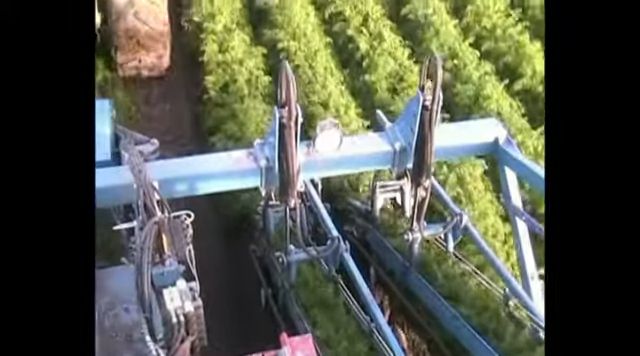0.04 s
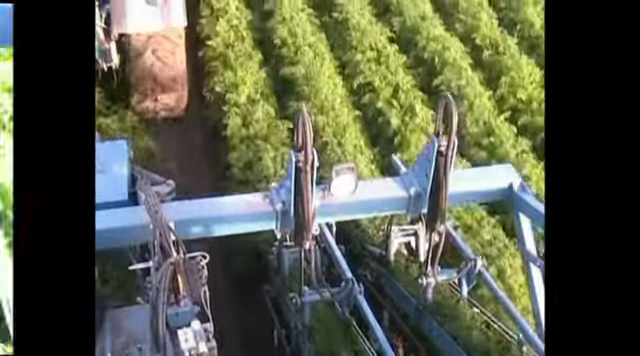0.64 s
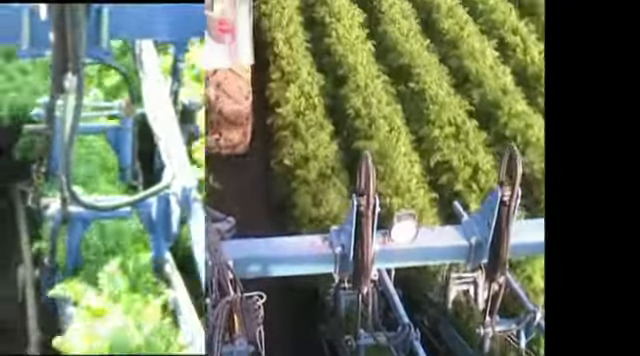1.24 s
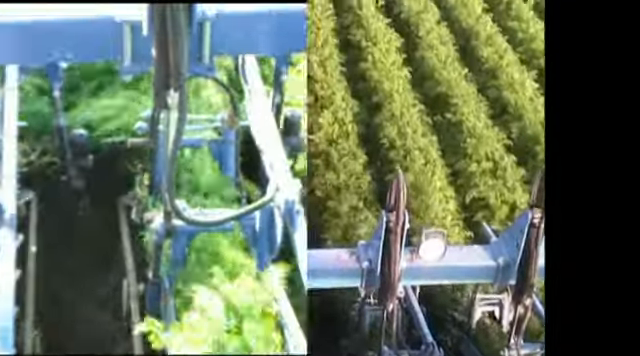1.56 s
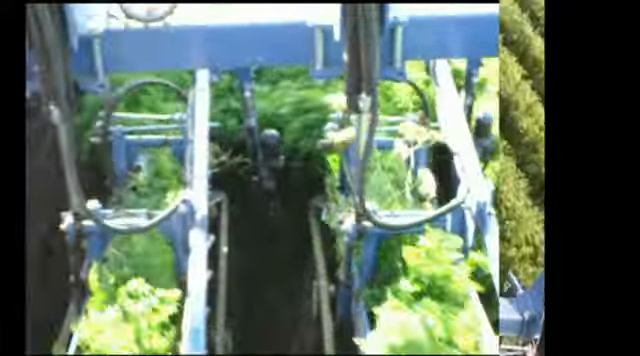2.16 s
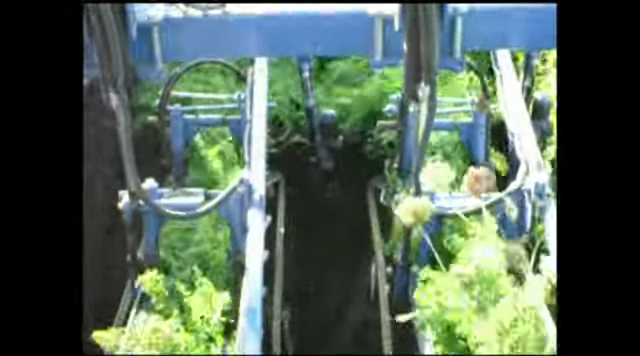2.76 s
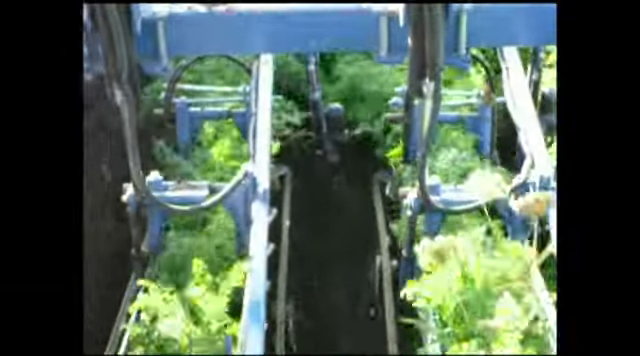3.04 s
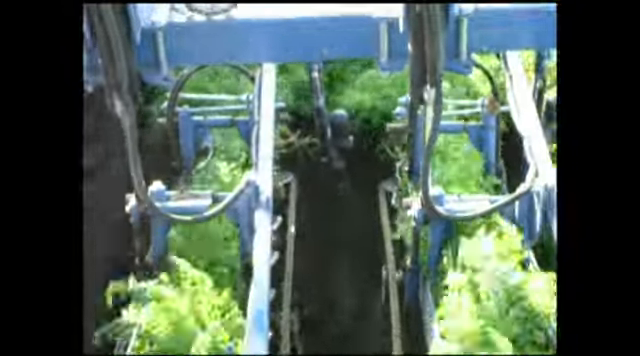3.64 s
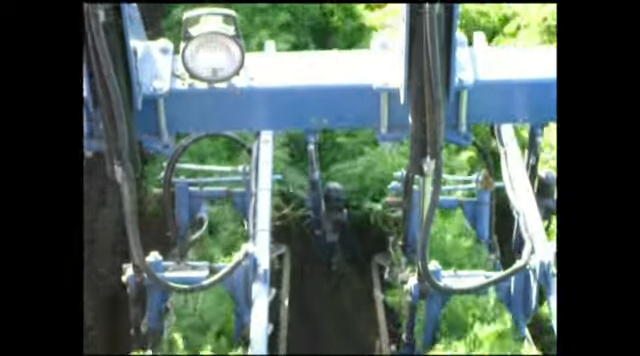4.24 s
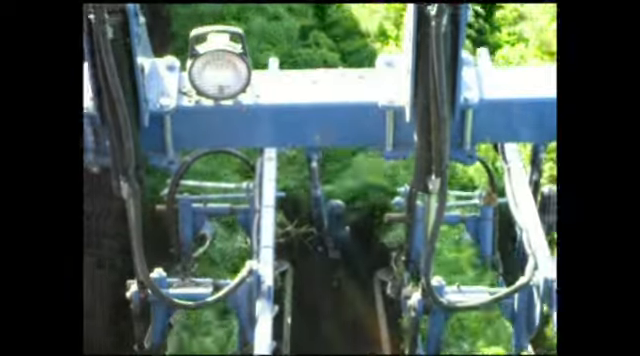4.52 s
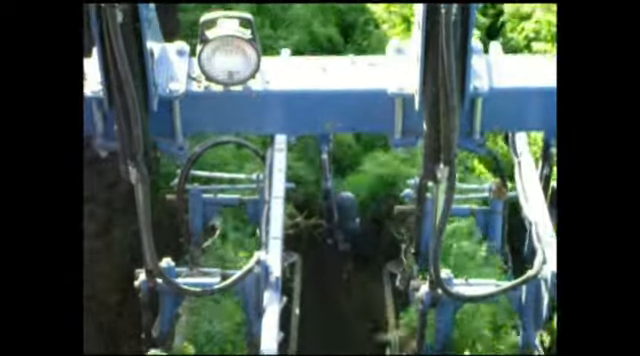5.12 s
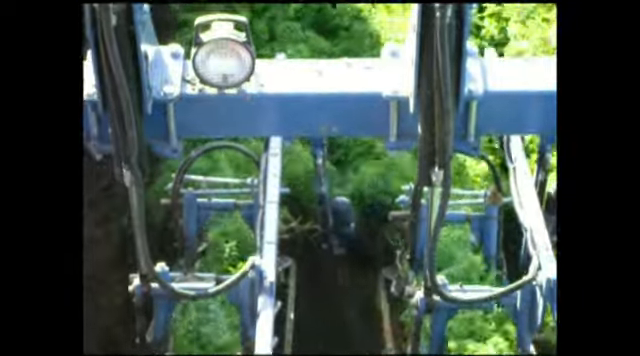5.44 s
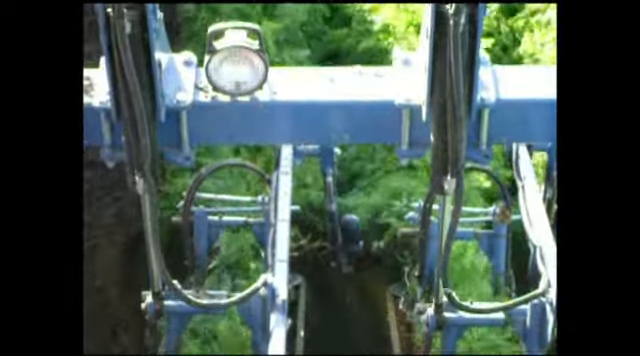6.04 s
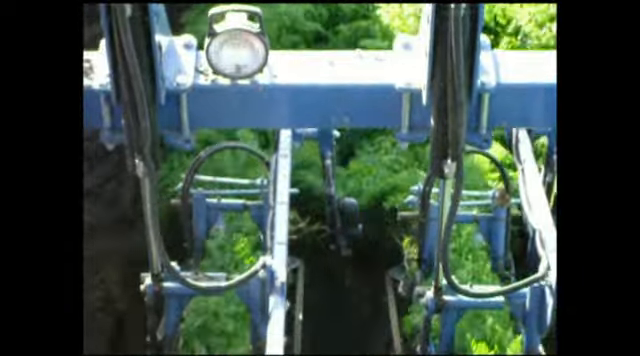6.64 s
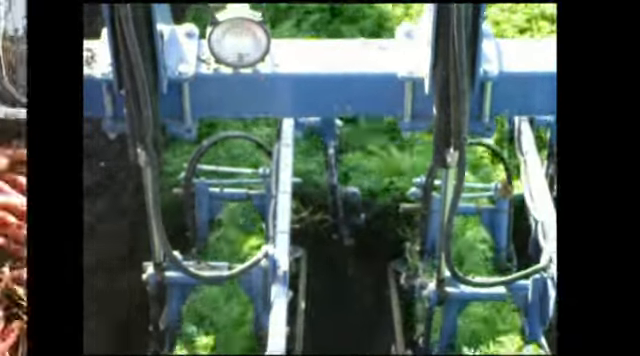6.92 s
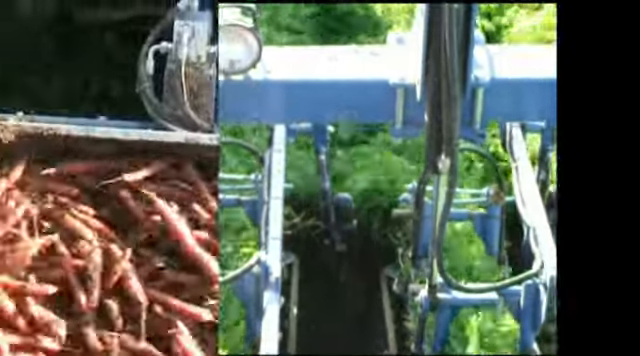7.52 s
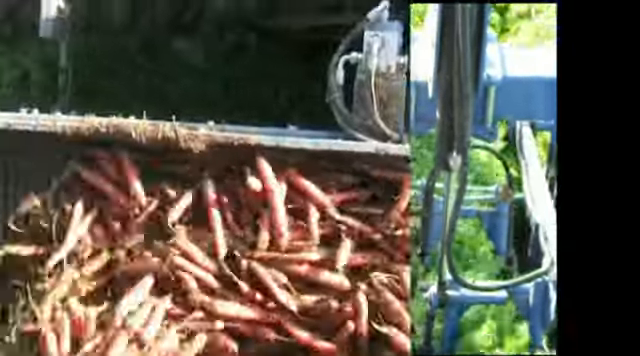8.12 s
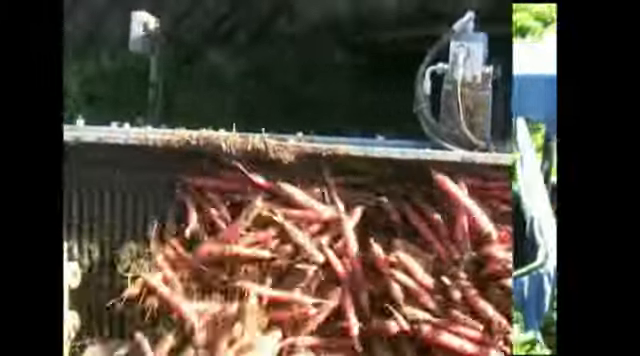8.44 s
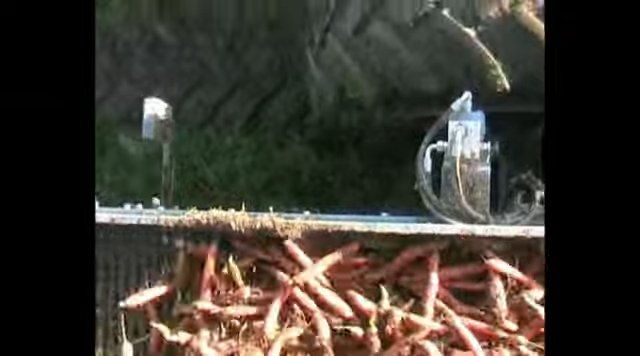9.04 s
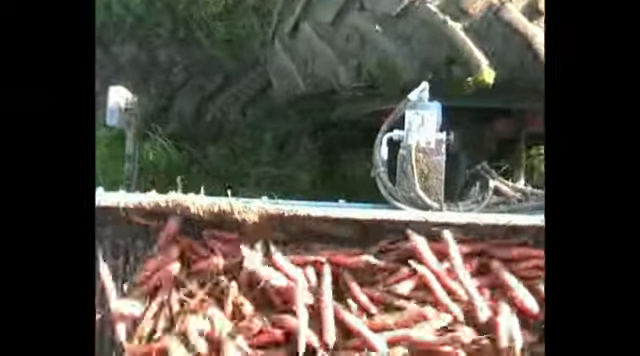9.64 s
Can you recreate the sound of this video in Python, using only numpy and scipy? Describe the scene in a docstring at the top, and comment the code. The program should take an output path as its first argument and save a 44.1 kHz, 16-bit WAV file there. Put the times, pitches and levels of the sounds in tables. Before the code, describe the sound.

Heard close up from three places that blend into one another, a harvester works through a carrot field. First comes a loud diesel drone with gear whine, rustling tops, a short squeal and a few knocks. Next the lifting belts give a softer, dull rush and hum. Finally the conveyor rattles loudly with tumbling carrots, sifting soil and irregular knocks of stones on steel.

```python
"""A carrot harvester at work

The tractor-drawn machine is heard from three places, each fading into the next: above the boom (loud),
over the lifting belts (quieter, dull) and beside the carrot conveyor (loud, rattling).
A diesel fires steadily against the hum of a slower hydraulic drive. Gears whine, a pulley squeals,
leaves swish along the guides, stones knock on steel and earth sifts through the conveyor's rods."""
import sys
import numpy as np
from scipy import signal
from scipy.fft import rfft, irfft, next_fast_len
from scipy.io import wavfile
from scipy.ndimage import uniform_filter1d, map_coordinates

SR = 44100
rng = np.random.default_rng(int(sys.argv[2]) if len(sys.argv) > 2 else 0)


def unload_wav(signal):
    """Save mono or channel-first audio to the path in sys.argv[1] as 16-bit WAV at rate SR, clipped to [-1, 1]."""
    wavfile.write(
        sys.argv[1],
        SR,
        np.round(np.clip(np.atleast_2d(signal).T, -1, 1) * 32767).astype(np.int16),
    )


N = 430857

# how alike left and right sound at each place: pitch_hz, likeness (0 to 1)
BOOM_LIKENESS = [(60, .3), (140, .92), (340, .93), (820, .94), (2000, .88), (4700, .7), (11000, .55)]
CONVEYOR_LIKENESS = [(60, .1), (140, .78), (340, .96), (820, .94), (2000, .88), (4700, .72), (11000, .55)]
# how sound reaches the two sides at each place: pitch_hz, left_louder_db, left_ahead_radians
BOOM_SIDES = [(30, 3, -2.4), (70, 4.5, -1.1), (170, 2.2, -.5), (280, 1.3, -.35), (400, 1.8, -.5),
              (520, -.7, -.4), (800, .4, -.25), (1700, .6, -.2), (3800, -.2, -.65), (5200, 0, -.55),
              (8700, .3, -1.45), (11300, .5, -2.8)]
CONVEYOR_SIDES = [(60, -8, 2.0), (150, -4.8, 1.15), (280, -2.8, .45), (420, -4, .12), (530, -3, .2),
                  (650, -3.8, 0), (830, -5, 0), (1500, -3.2, -.15), (4000, -1.5, -.95), (7300, 0, -1.5),
                  (11300, .3, -3)]
UNLOAD_S, UNLOAD_LENGTH_S = 6.0, 0.128  # the belts lose their load


def amp(db):
    """Turns decibels into a number to multiply by."""
    return 10 ** (np.asarray(db) / 20)


def unit(x):
    """Scales a sound to an average power of 1."""
    return x / np.sqrt(np.mean(x ** 2) + 1e-20)


def along(points, hz):
    """Reads between (pitch_hz, value) rows on a logarithmic pitch scale."""
    pitches, values = np.transpose(points)
    return np.interp(np.log(hz + 1), np.log(pitches + 1), values)


def curve(rows):
    """One value per sample from (time_s, value) rows."""
    return np.interp(np.arange(N) / SR, *np.transpose(rows))


def since(start_s):
    """Seconds gone by after start_s."""
    return np.maximum(np.arange(N) / SR - start_s, 0)


def ramp(start_s, length_s):
    """Rises in a straight line from 0 to 1."""
    return np.minimum(since(start_s) / length_s, 1)


def wobble(per_second):
    """A smooth curve through per_second random values each second."""
    positions = np.arange(0, N + 64, 64) * per_second / SR
    coarse = map_coordinates(rng.standard_normal(1024), [positions], mode="wrap")
    return np.interp(np.arange(N) / 64, np.arange(len(coarse)), coarse)


def angle(hz):
    """How far a shaft has turned, in radians, at hz turns a second."""
    return 2 * np.pi * np.cumsum(hz) / SR


def filtered(x, response):
    """Multiplies each frequency in x by response(hz)."""
    size = next_fast_len(N + 8192)
    return irfft(rfft(x, size) * response(np.fft.rfftfreq(size, 1 / SR)), size)[..., :N]


def band(x, centre_hz, half_width_hz):
    """The part of x near one pitch."""
    return filtered(x, lambda hz: 1 / (1 + ((hz - centre_hz) / half_width_hz) ** 2))


def ringing(pitch_hz, half_width_hz, level_db):
    """A part shaken at random rings in a narrow band of noise."""
    return amp(level_db) * unit(band(rng.standard_normal(N), pitch_hz, half_width_hz))


def churn(patchy_db):
    """Two noises with louder and softer patches across time and pitch."""
    spectra = signal.stft(rng.standard_normal((2, N)), nperseg=512)[2]
    patches = rng.standard_normal(spectra.shape[1:])
    patches = uniform_filter1d(uniform_filter1d(patches, 6, axis=0), 12, axis=1)
    return unit(signal.istft(spectra * amp(patchy_db * unit(patches)), nperseg=512)[1][:, :N])


def rattle(per_second, decay_s):
    """Many small hits, each a short burst of noise."""
    hits = (rng.random(N) < per_second / SR) * rng.uniform(.3, 1, N) ** 4
    energy = signal.lfilter([1], [1, -np.exp(-1 / (decay_s * SR))], hits)
    return unit(np.sqrt(energy) * rng.standard_normal((2, N)))


def spread(pair, spectrum, likeness):
    """Shapes the tone of two noises and blends them into left and right."""
    def response(hz):
        turn = np.arccos(np.clip(along(likeness, hz), 0, 1)) / 2
        return amp(along(spectrum, hz)) * np.array([np.cos(turn), np.sin(turn)])
    middle, side = filtered(pair, response)
    return np.array([middle + side, middle - side]) / np.std(middle)


def to_sides(x, sides):
    """Sound reaches left and right at different levels and slightly out of step."""
    half, table = np.array([[.5], [-.5]]), np.array(sides)
    louder, ahead = table[:, :2], table[:, ::2]
    return filtered(x, lambda hz: amp(half * along(louder, hz)) * np.exp(1j * half * along(ahead, hz)))


def harmonics(shaft, rows, flutter_db, jitter_radians):
    """The tones of one turning part at the three places; higher ones waver most."""
    out = np.zeros((3, N))
    for multiple, *place_db in rows:
        shake = np.sqrt(multiple)
        flutter = amp(flutter_db * shake * wobble(14))
        tone = np.sin(multiple * shaft + jitter_radians * shake * wobble(12))
        out += np.sqrt(2) * amp(place_db)[:, None] * flutter * tone
    return out


def diesel_speed():
    """Firings a second: the engine wanders a little and slows slightly as the load comes on."""
    firing_hz, droop_hz, wander_hz = 80.9, 0.3, 0.05
    return firing_hz - droop_hz * ramp(start_s=1.766, length_s=1.5) + wander_hz * wobble(1)


def diesel(firing):
    """The engine's even firings blend into a drone."""
    # engine tones: multiple of the firing rate, boom_db, belts_db, conveyor_db
    engine_tones = [(1, -24.5, -39, -31), (2, -29, -45, -32), (3, -20.5, -59, -38), (5, -32, -60, -37.5),
                    (6, -32, -56, -43.5), (7, -37.5, -61.5, -54)]
    return harmonics(firing, engine_tones, flutter_db=.5, jitter_radians=0.023)


def drive_speed():
    """Turns a second: the drive speeds up as the belts run light, then sags as the conveyor fills."""
    lifting_hz, light_hz, laden_hz = 72.43, 75.24, 69.16
    fill_s, fill_lag_s = 7.78, 0.48
    unloaded = ramp(UNLOAD_S, UNLOAD_LENGTH_S)
    fullness = 1 - np.exp(-since(fill_s) / fill_lag_s)
    return lifting_hz + (light_hz - lifting_hz) * unloaded + (laden_hz - light_hz) * fullness


def hydraulic_drive(drive):
    """The turning drive hums; at the belts the hum drops when they lose their load."""
    # drive tones: multiple of the turning rate, boom_db, belts_db, conveyor_db
    drive_tones = [(1, -69, -45.5, -37.5), (2, -72, -36.5, -22.5), (2.5, -70, -53.5, -56),
                   (3, -70, -48.5, -33.5), (3.5, -70, -56.5, -60), (4, -33.5, -50, -26.5),
                   (5, -70, -59, -39), (6, -70, -64.5, -39.5), (7.5, -72, -62, -33), (9.5, -70, -59.5, -42)]
    hum = harmonics(drive, drive_tones, flutter_db=0.34, jitter_radians=0.1)
    hum[1] *= amp(-21 * ramp(UNLOAD_S, UNLOAD_LENGTH_S))
    return hum


def gears(drift, roughness, swing_db):
    """Gear and pump tones rise and sag together with the load."""
    # gear and pump tones: pitch_hz, boom_db, belts_db, conveyor_db
    whines = [(103.2, -33, -59, -58), (252.8, -34, -51.5, -57), (294.3, -33.5, -54, -37.5),
              (496.3, -34.5, -51, -51), (512.4, -39, -45.5, -32), (527.5, -49, -58.5, -30.5),
              (564, -41, -55, -52), (671, -42, -59, -35.5), (833.5, -32, -51.5, -34.5),
              (1529, -36, -58.5, -53)]
    # how fast the gears turn: time_s, share of the usual speed
    gear_speed = [(0, 1), (.8, .997), (2.2, 1.003), (4, 1), (6, 1.004), (7, 1.002), (7.5, .997),
                  (8.7, .997), (9, 1.01), (9.2, 1.002), (9.77, .998)]
    speed = curve(gear_speed) + drift * wobble(6)
    out = np.zeros((3, N))
    for hz, *place_db in whines:
        tone = np.sin(angle(hz * speed) + roughness * np.sqrt(hz / 800) * wobble(30))
        out += amp(place_db)[:, None] * unit(tone * amp(swing_db * wobble(9.2)))
    return out


def boom(tones, firing):
    """Above the boom: roar and ringing steel pulse with the firings, over a drone and a squeal."""
    # tone of the roar: pitch_hz, relative_db
    roar_shape = [(25, -42), (52, -17), (75, -19), (140, -7), (175, -7), (205, 2.5), (245, -4), (300, -4),
                  (360, -8), (500, -6), (800, -12.5), (1100, -15), (2000, -18.5), (3200, -25.5),
                  (6300, -36.5), (8500, -36), (10800, -47), (12000, -76)]
    # how hard the boom shakes on uneven ground: time_s, level_db
    shaking = [(0, -16.5), (.15, -15.5), (.3, -18), (.45, -15.5), (.7, -16), (1.15, -16.5), (1.5, -15.5),
               (1.8, -15.5), (2.1, -15), (2.4, -19)]
    # steel parts kept ringing by the shaking: pitch_hz, half_width_hz, level_db
    steel_parts = [(768, 20, -31.5), (1300, 20, -41), (2160, 18, -47), (2530, 17, -41.5)]
    pulsing = amp(0.51 * np.cos(firing) + 0.31 * wobble(14.2))
    roar = amp(curve(shaking)) * spread(churn(patchy_db=0.94), roar_shape, BOOM_LIKENESS)
    steel = sum(ringing(*part) for part in steel_parts)
    drone = tones * amp(0.5 - 1.3 * since(0))  # eases by 1.3 dB a second
    return to_sides(drone + (roar + steel) * pulsing + pulley_squeal(), BOOM_SIDES)


def leaves():
    """Carrot tops swish along the guides in tufts; stalks scrape brightly over steel."""
    # how strongly the tops brush the guides: time_s, level_db
    leaf_flow = [(0, -36), (.1, -38), (.3, -39.5), (.42, -34.5), (.63, -41), (.75, -37.5), (1.0, -39),
                 (1.2, -39), (1.6, -35.5), (2.0, -37.5), (2.4, -35)]
    # dragged stalks: start_s, length_s, level_db
    scrapes = [(0.355, 0.17, -28.5), (0.692, 0.094, -31.5)]
    # tone of the swish and of the scrapes: pitch_hz, relative_db
    swish_shape = [(600, -21), (2200, -4.5), (4000, -2.5), (6500, -4), (8600, -0.5), (10300, -5.5),
                   (11200, -16), (12000, -54), (14000, -80)]
    scrape_shape = [(700, -17), (1400, 10), (2400, 8), (4000, -2), (8500, -7), (11000, -5.5),
                    (14000, -19.5)]
    swish = spread(churn(patchy_db=2.0), swish_shape, BOOM_LIKENESS)
    tufts_db = -2 * wobble(13.6)
    swish *= amp(curve(leaf_flow) + tufts_db)
    strokes = sum(amp(db) * np.sin(np.pi * ramp(start_s, length_s)) for start_s, length_s, db in scrapes)
    scrape = strokes * spread(rattle(per_second=720, decay_s=0.0028), scrape_shape, BOOM_LIKENESS)
    return to_sides(swish + scrape, BOOM_SIDES)


def wide_hiss():
    """A thin, high hiss, opposite in left and right, seems to come from all round."""
    # tone of the hiss: pitch_hz, relative_db
    hiss_shape = [(8500, -25), (10300, -6), (11200, 1), (12500, 1), (14500, -6.5), (15200, -9)]
    hiss = unit(filtered(rng.standard_normal(N), lambda hz: amp(along(hiss_shape, hz))))
    return np.array([hiss, -hiss])


def belts(tones, drive):
    """Over the lifting belts: a muffled, centred rush with fine ticking and thinly singing rollers."""
    # tone of the rush, and the muffling of its treble: pitch_hz, relative_db
    rush_shape = [(20, -12), (45, -4), (80, -2), (130, 0.5), (280, 0), (400, -4), (510, -1), (620, -2.5),
                  (1100, -6.5), (1450, -10.5), (2000, -9), (2400, -7.5), (3200, -11), (5100, -19),
                  (6500, -24.5)]
    muffling = [(5100, 0), (5550, -14), (5900, -2.5), (6500, -7), (7000, -13), (7600, -27), (8200, -65)]
    # how thickly the crop crowds the belts: time_s, level_db
    crop_load = [(0.4, -38), (1.1, -30), (1.55, -28.5), (1.95, -34.5), (2.4, -34.5), (6.0, -34.5),
                 (6.13, -35.5)]
    rush = churn(patchy_db=0.6)[0] * amp(.5 * np.cos(2 * drive))
    ticking = 0.39 * rattle(per_second=90, decay_s=0.0048)[0]
    muffled = filtered(rush + ticking, lambda hz: amp(along(rush_shape, hz) + along(muffling, hz)))
    rollers = ringing(pitch_hz=2286, half_width_hz=26, level_db=-52.5)
    return tones + rollers + amp(curve(crop_load)) * unit(muffled)


def pulley_squeal():
    """A belt pulley squeals hoarsely, swelling fast and dying away slowly."""
    start_s, rise_s, fall_db_per_s = .38, 0.22, 8.5
    squeal = ringing(pitch_hz=4730, half_width_hz=150, level_db=-38)
    return squeal * ramp(start_s, rise_s) * amp(.8 * wobble(29.9) - fall_db_per_s * since(start_s))


def stones():
    """Stones and carrots knock on the steel frame, whose ring is cut short by soil."""
    # knocks: start_s, relative_db, treble_limit_hz
    knocks = [(0.697, -29, 9000), (0.739, -28, 9050), (1.453, -34, 10000), (1.5585, -31, 10000),
              (1.793, -35, 9900), (7.21, -27.5, 4840), (7.3102, -25.5, 6670), (7.522, -29, 6470),
              (7.6804, -29, 9060), (7.804, -30, 10000), (8.049, -26.5, 9800), (8.5396, -26, 9300),
              (8.6073, -28, 10040), (8.974, -24, 7940), (9.1165, -21, 7000), (9.1603, -21.5, 5230),
              (9.2, -21, 4530), (9.351, -20.5, 6600), (9.5294, -29.5, 10000), (9.721, -21.5, 6000)]
    # notes of the struck frame: pitch_hz, relative_db, ring_s (time to fade by 60 dB)
    steel_notes = [(1280, -10, .03), (2320, -2, .03), (3360, 6, 0.028), (4150, 9.5, 0.026),
                   (5200, -12, .025), (6300, -1, .02)]
    out, t = np.zeros(N + SR), np.arange(SR // 6) / SR
    for start_s, knock_db, treble_limit_hz in knocks:
        ring = np.zeros(len(t))
        for hz, note_db, ring_s in steel_notes:
            fade = amp(note_db + rng.normal(0, 2.7) - 60 * t / ring_s)
            ring += fade * np.sin(2 * np.pi * hz * rng.normal(1, 0.035) * t)
        crack = 2.9 * amp(-60 * t / 0.075) * rng.standard_normal(len(t))
        treble_cut = signal.butter(4, treble_limit_hz, fs=SR, output="sos")
        knock = signal.sosfilt(treble_cut, 0.59 * ring + crack)
        out[round(start_s * SR):][:len(t)] += amp(knock_db - 10.5) * knock
    return filtered(out[:N], lambda hz: hz < 11000)


def conveyor(tones, drive):
    """Beside the conveyor: rods rattle and carrots tumble over the roar; the frame groans as it fills."""
    # tone of the roar: pitch_hz, relative_db
    roar_shape = [(25, -32), (60, -15), (110, -6.5), (210, 0.5), (310, 0), (450, -6.5), (540, -3.5),
                  (700, -6), (1050, -12), (1600, -13.5), (2300, -16.5), (5000, -24.5), (8500, -28.5),
                  (10800, -45), (11800, -99)]
    # how heavily the crop rides the conveyor: time_s, level_db
    crop_load = [(6.6, -18), (7.5, -19.5), (8.1, -18), (8.45, -18.5), (8.7, -18), (9.0, -19), (9.3, -18.5),
                 (9.77, -18)]
    # steel parts kept ringing by the rods: pitch_hz, half_width_hz, level_db
    steel_parts = [(1060, 25, -37), (1572, 19, -38.5), (1684, 12, -49)]
    # how much the frame's own note stands out under load: time_s, boost_db
    frame_groan = [(6.6, -2.5), (7.6, -5.5), (8.0, -2.5), (8.4, 0.5), (8.65, 0), (8.9, 5), (9.1, -0.5),
                   (9.3, 3), (9.77, 0.5)]
    shaking = churn(patchy_db=1.0) * amp(0.84 * np.cos(2 * drive))
    shaking += 0.5 * rattle(per_second=280, decay_s=0.0049)
    roar = amp(curve(crop_load) + 0.32 * wobble(6.8)) * spread(shaking, roar_shape, CONVEYOR_LIKENESS)
    steel = sum(ringing(*part) for part in steel_parts)
    # a resonance that the drive meets when running light
    light_hum = (amp(5.5) - 1) * band(tones, centre_hz=308.4, half_width_hz=12)
    sound = roar + steel + tones + light_hum
    groan = (amp(curve(frame_groan)) - 1) * band(sound, centre_hz=530, half_width_hz=39)
    return to_sides(sound + groan, CONVEYOR_SIDES)


def soil():
    """Crumbs of earth hiss through the conveyor rods."""
    # tone of the sifting earth: pitch_hz, relative_db
    hiss_shape = [(1000, -23), (3500, -9), (5500, -15), (8500, 2), (10300, -1.5), (10900, -8), (11500, -47),
                  (12500, -85)]
    crumbs = churn(patchy_db=2.0) + .5 * rattle(per_second=300, decay_s=0.0028)
    return amp(-39.5) * to_sides(spread(crumbs, hiss_shape, CONVEYOR_LIKENESS), CONVEYOR_SIDES)


def scene():
    """Diesel, drive and gears sound at all three places; each place fades into the next."""
    # fades from boom to belts, then from belts to conveyor: start_s, end_s
    fades = [(0.36, 2.4), (6.63, 8.56)]
    firing, drive = angle(diesel_speed()), angle(drive_speed())
    tones = hydraulic_drive(drive) + diesel(firing) + gears(drift=0.00297, roughness=0.35, swing_db=0.45)
    boom_tones, belt_tones, conveyor_tones = tones
    to_belts, to_conveyor = (ramp(start_s, end_s - start_s) for start_s, end_s in fades)
    machine = (1 - to_belts) * (boom(boom_tones, firing) + leaves())
    machine += (to_belts - to_conveyor) * belts(belt_tones, drive)
    machine += to_conveyor * (conveyor(conveyor_tones, drive) + soil())
    hiss_gain = amp(-44.5) * (1 - to_belts) ** 3 + amp(-45) * to_conveyor
    return machine + stones() + hiss_gain * wide_hiss()


def record(dry):
    """Cuts off the very highest treble."""
    return filtered(dry, lambda hz: hz < 15200)


dry = scene()
out = record(dry)
unload_wav(out)
```